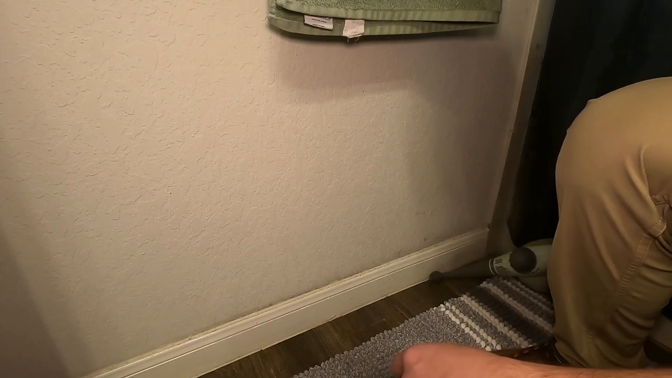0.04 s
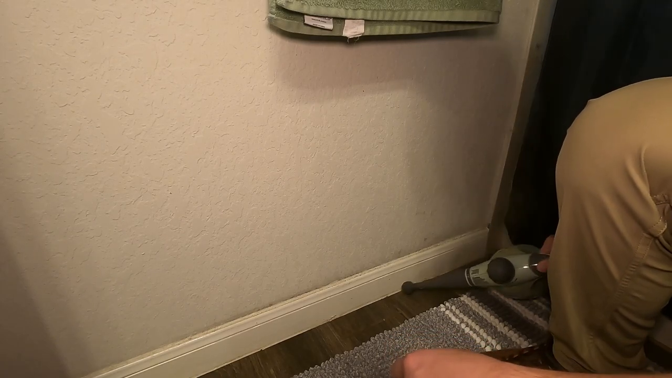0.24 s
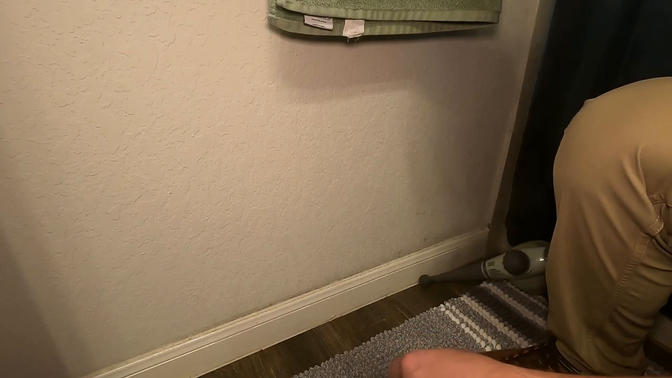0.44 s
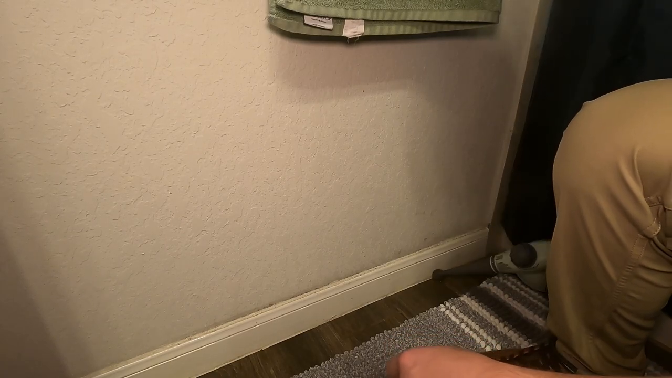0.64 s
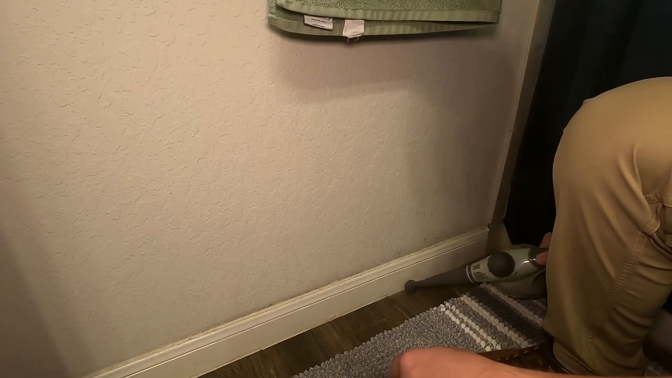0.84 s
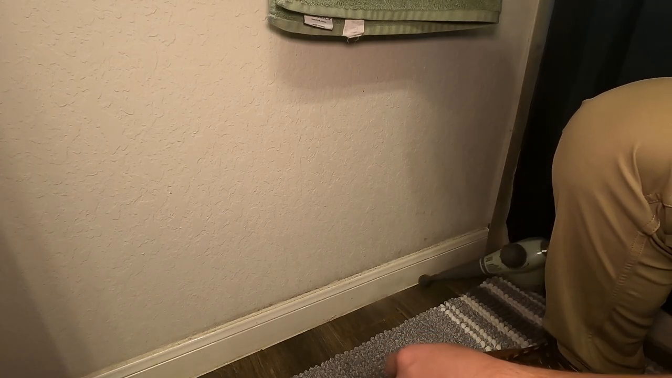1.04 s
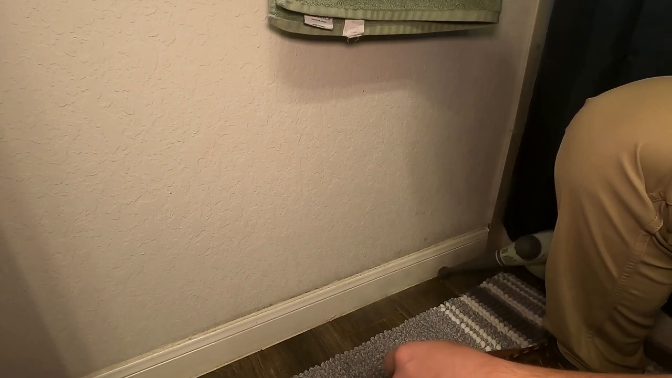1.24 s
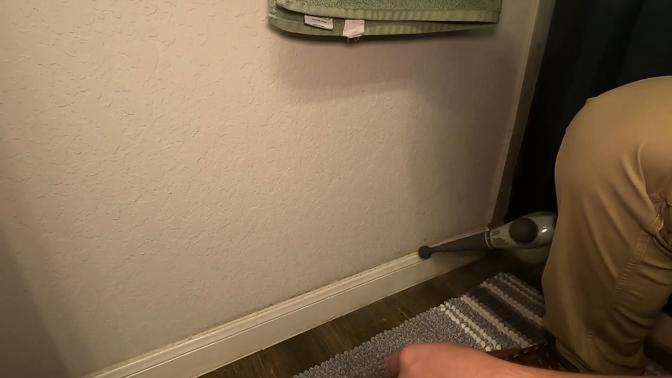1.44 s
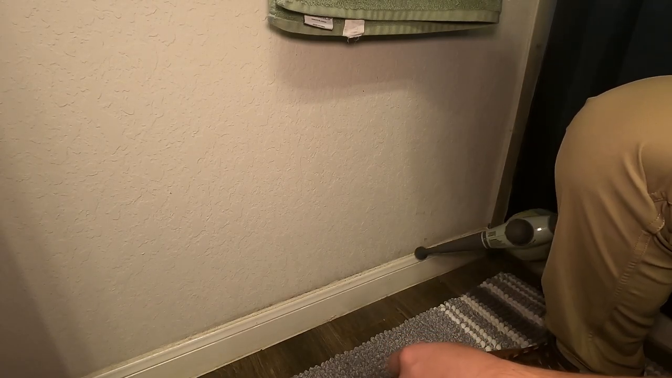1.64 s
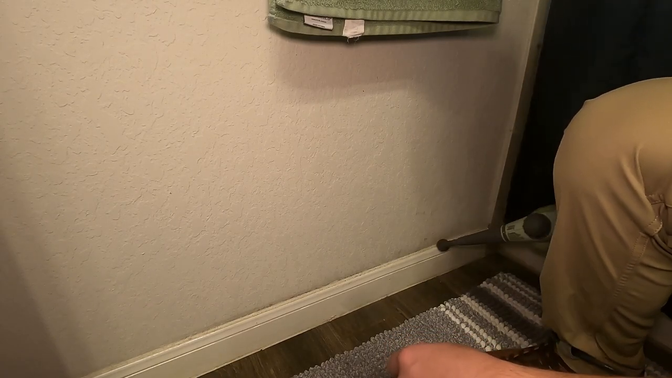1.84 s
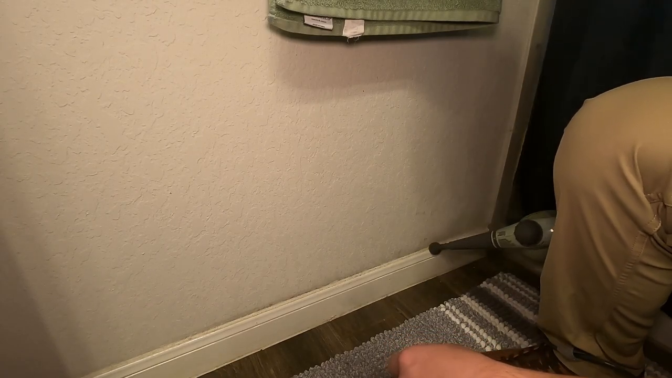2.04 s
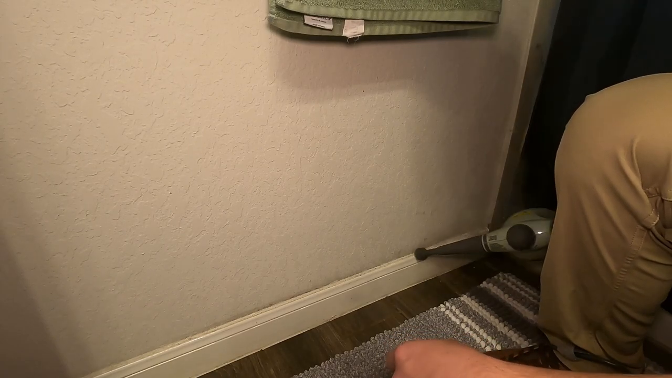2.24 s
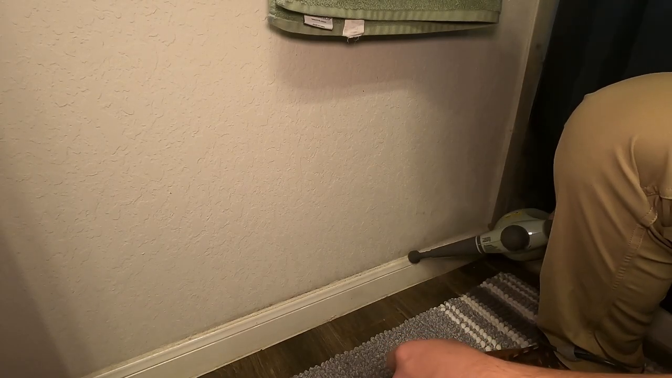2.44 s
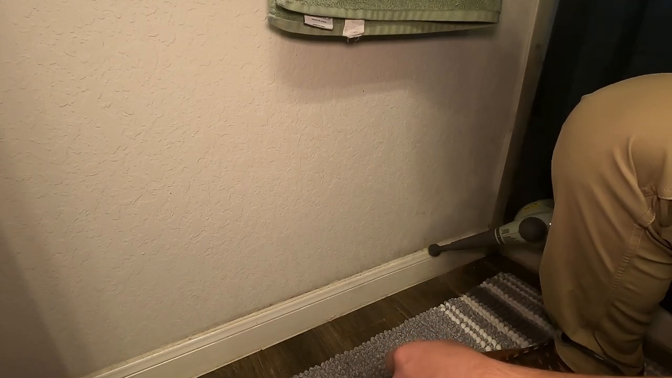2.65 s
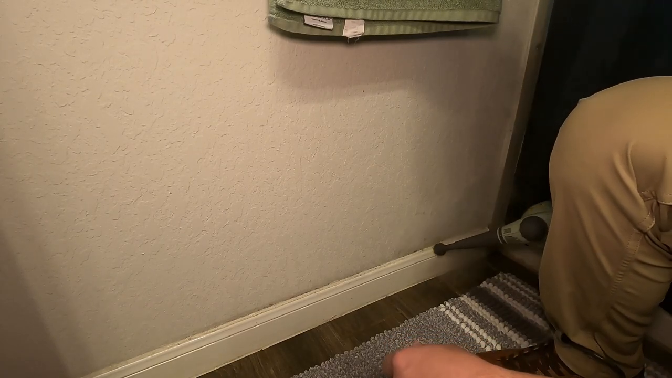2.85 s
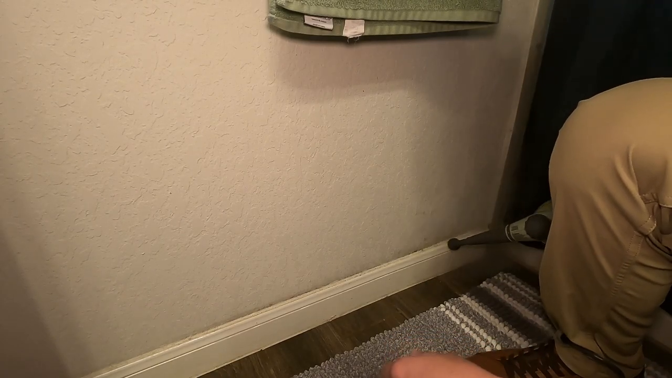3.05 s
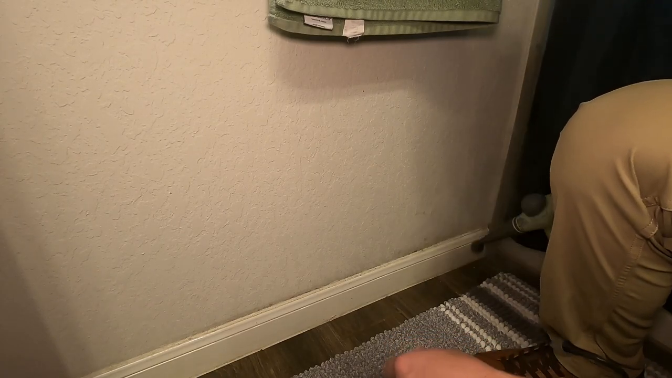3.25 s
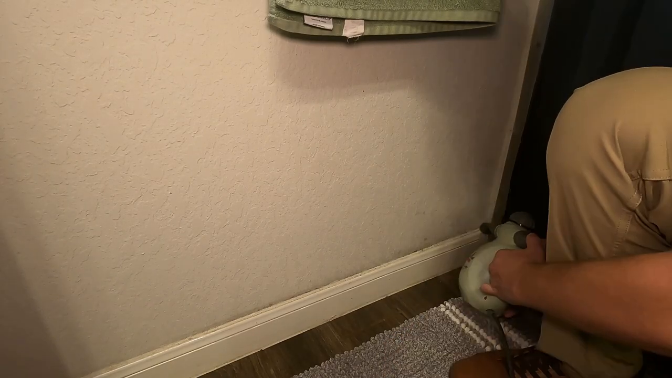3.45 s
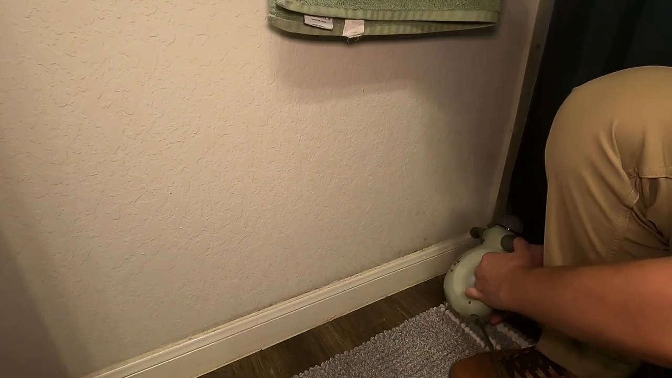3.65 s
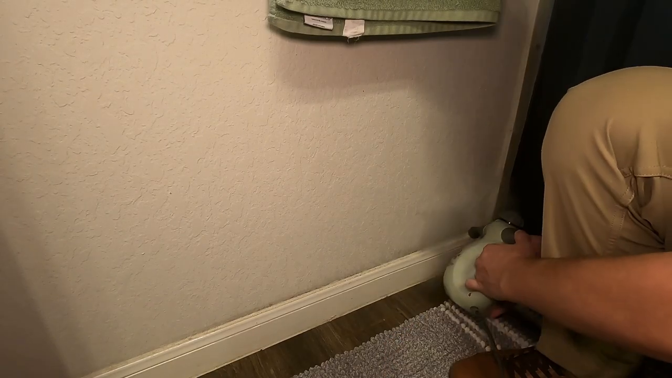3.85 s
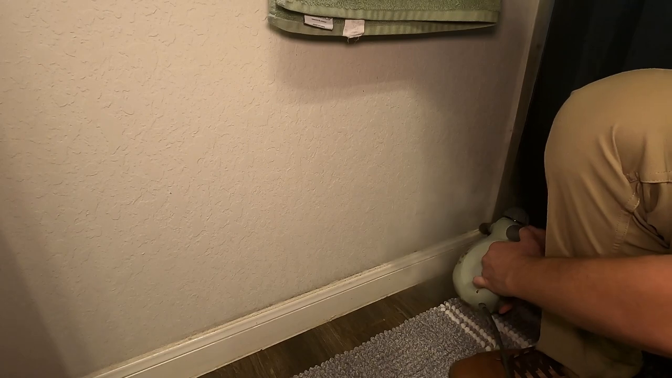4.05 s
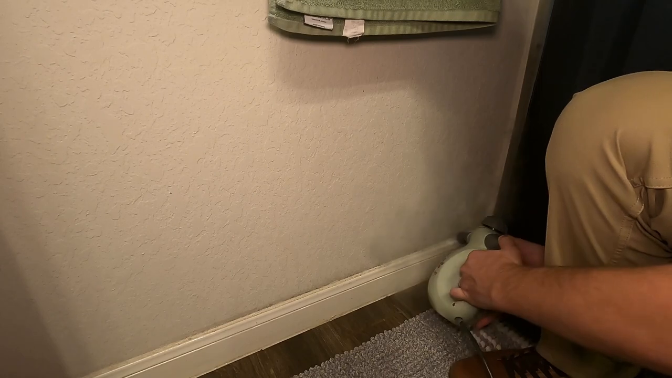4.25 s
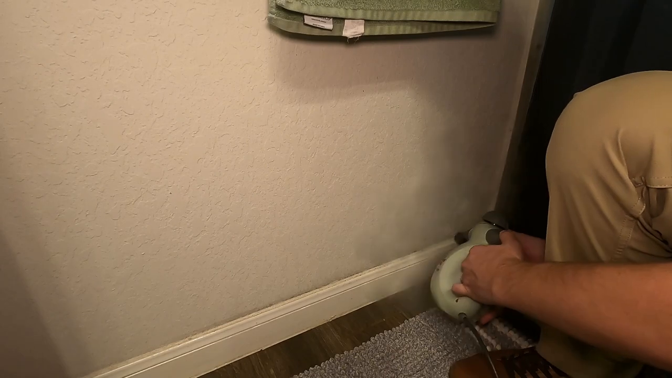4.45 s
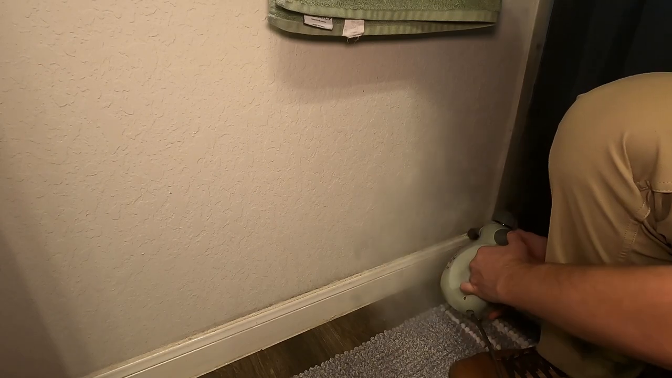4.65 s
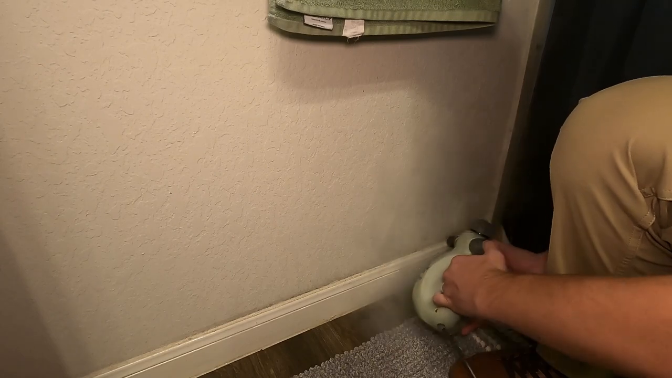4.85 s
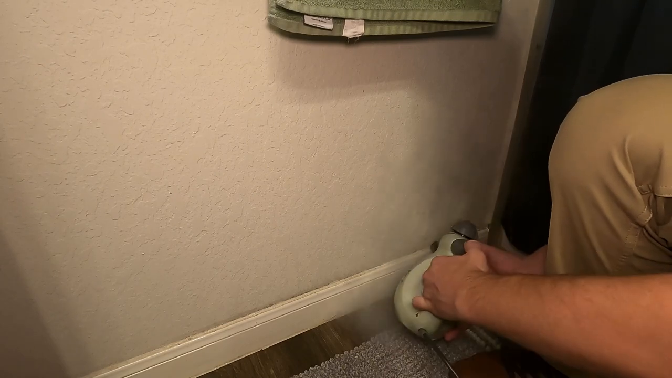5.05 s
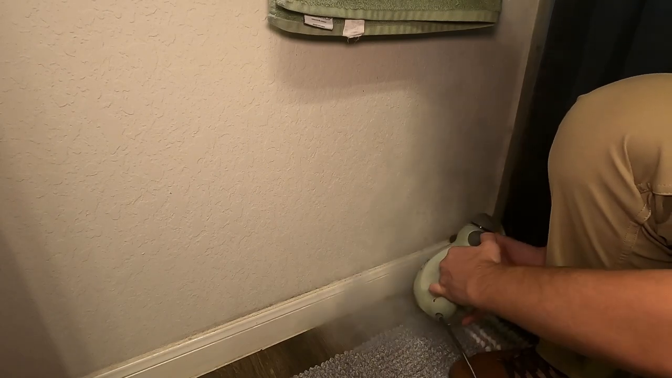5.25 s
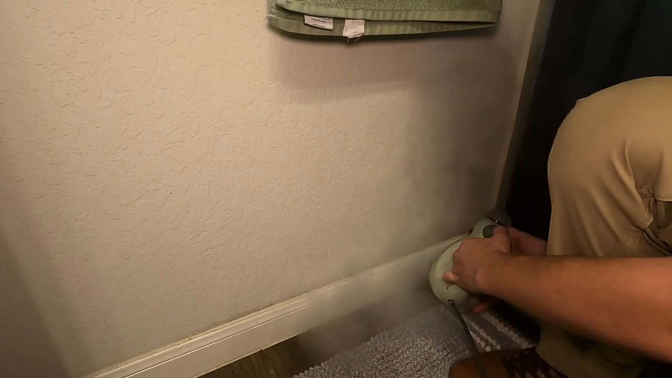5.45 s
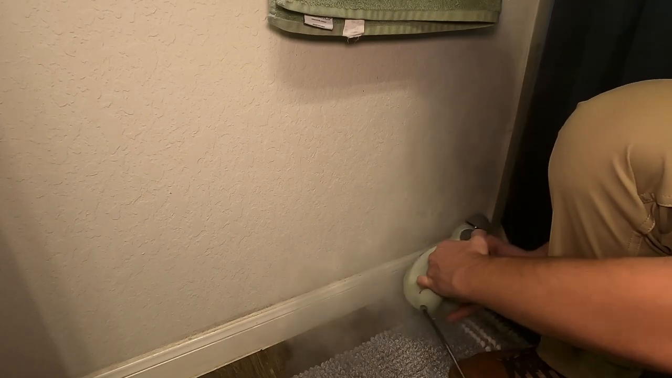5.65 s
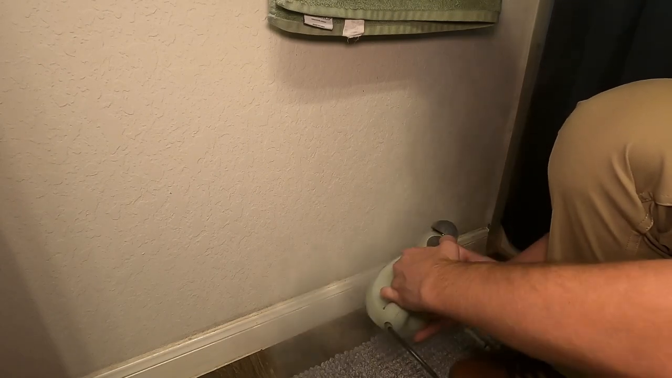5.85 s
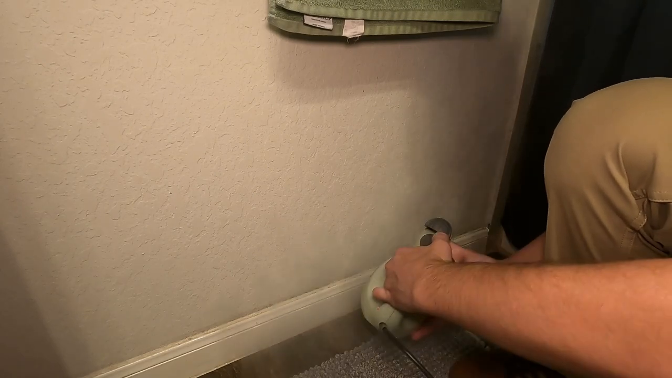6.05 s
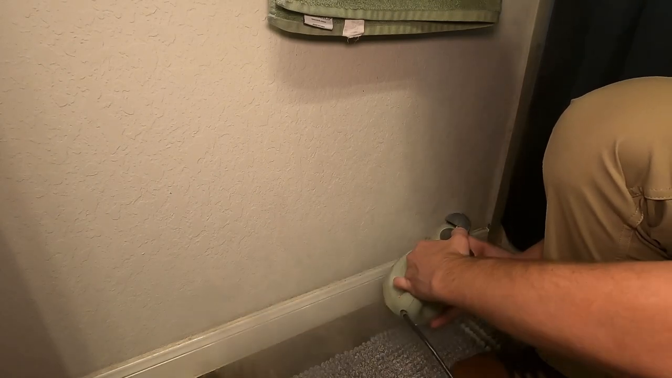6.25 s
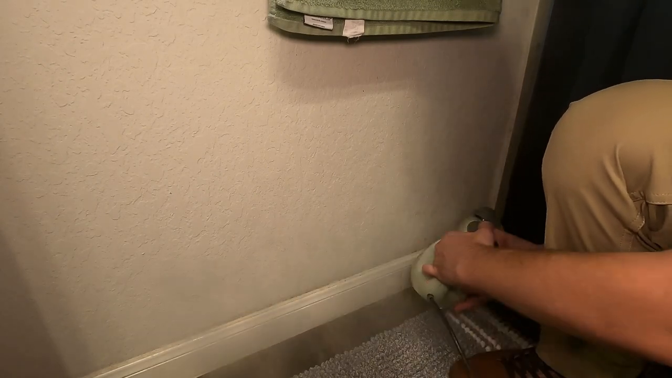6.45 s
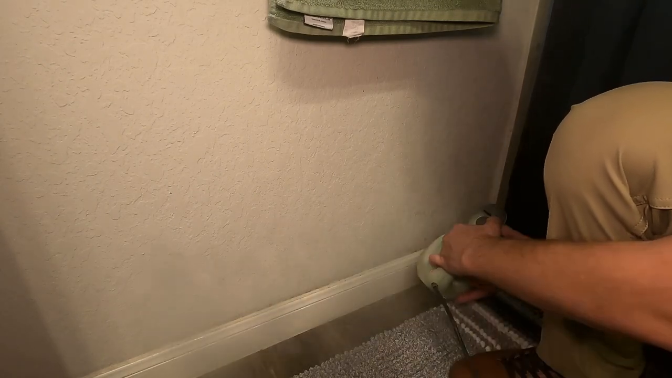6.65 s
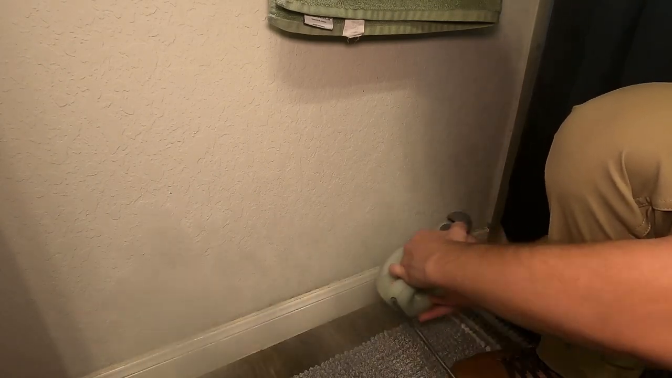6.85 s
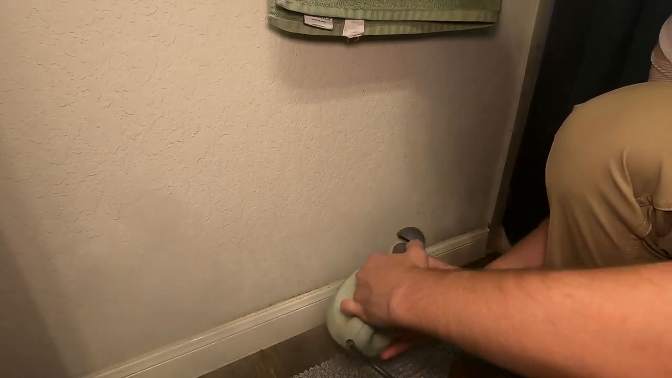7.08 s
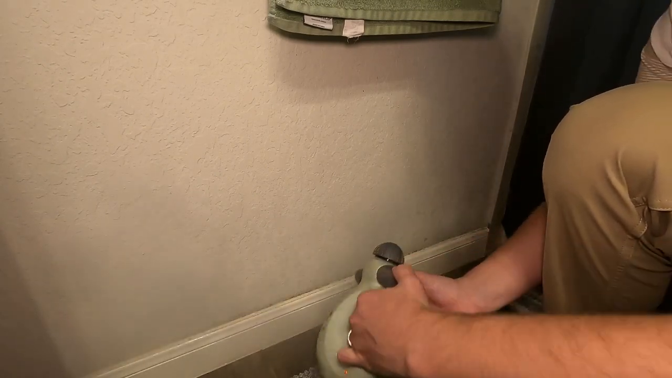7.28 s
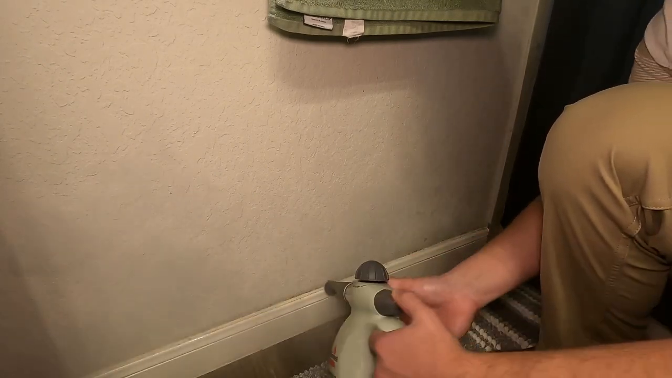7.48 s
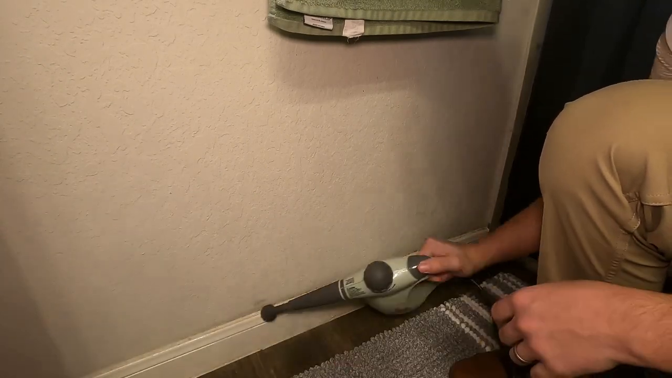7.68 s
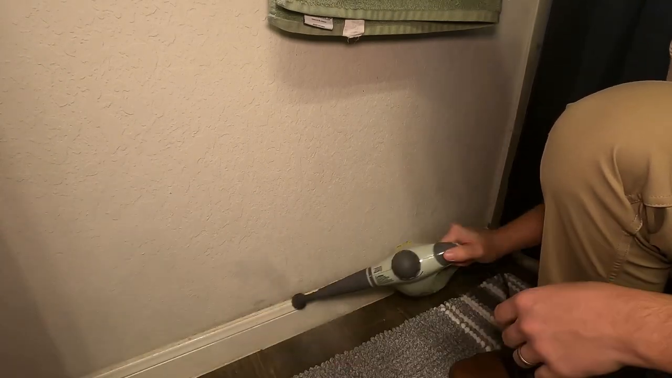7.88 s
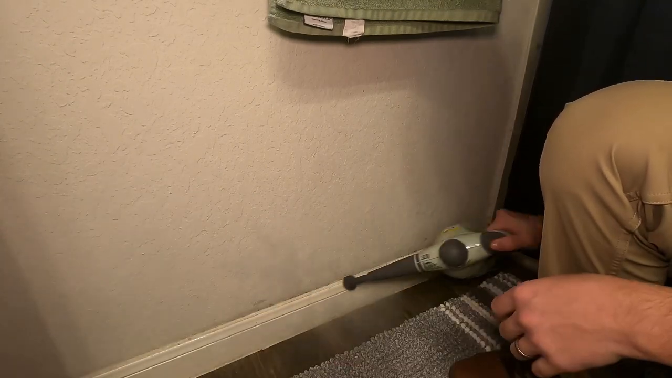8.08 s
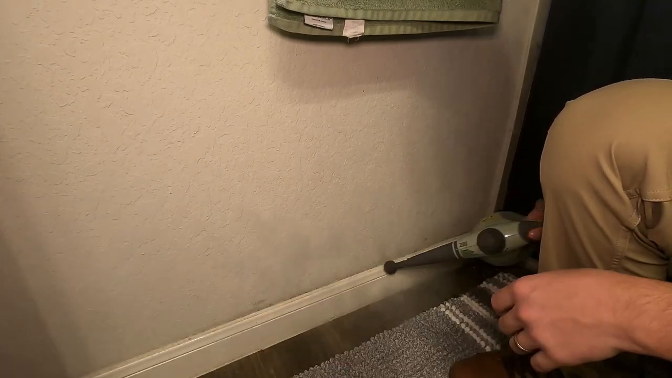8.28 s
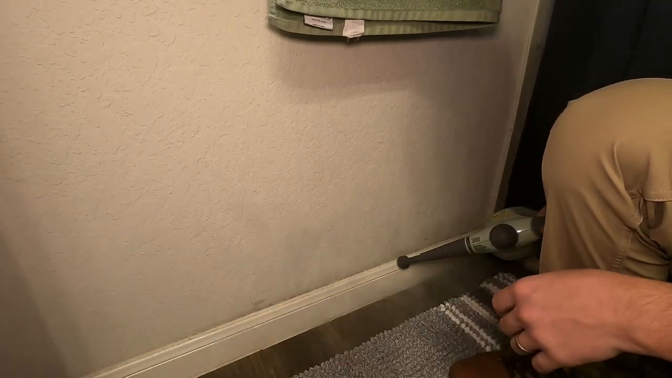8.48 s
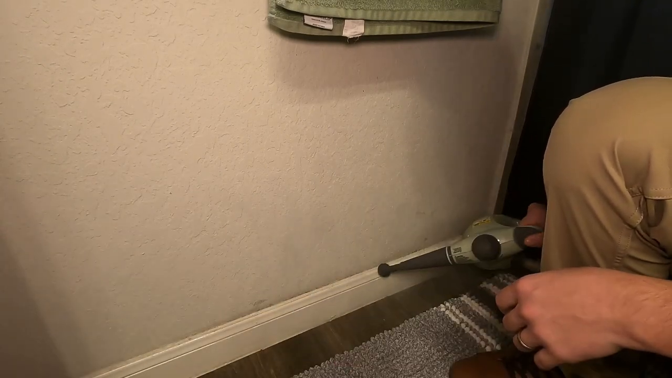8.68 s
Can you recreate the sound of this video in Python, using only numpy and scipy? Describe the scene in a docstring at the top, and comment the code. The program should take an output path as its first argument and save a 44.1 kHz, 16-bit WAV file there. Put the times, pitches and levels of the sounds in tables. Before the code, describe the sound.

Indoors, close to the floor, a handheld steam cleaner is already hissing, bright and flickering. From 0.15 to 1.5 s a bristly brush tip scrapes the skirting board in short, hollow, raspy strokes. At about 1.55 s the jet falls away, with a low thud at 1.66, then spits back at 1.85. More scrapes follow to 3.3 s, with small thumps and the heaviest floor thud at 3.1. The hiss dies at 3.4, leaving a brief gap with faint leaking steam and room noise, and bursts back abruptly at 3.6. It then runs long, its colour sweeping as the nozzle swings. A soft heavy bump comes at 5.3, dull scuffing drags from 5.8 to 6.75, and a tiny wet spit at 6.77. Stronger drags at 7.0 to 7.7 accompany low rumbling. The jet stops at 7.5, restarts near 7.75 with a thump and short scrape, and hisses to the end.

```python
"""Indoors, along a skirting board: a handheld steam cleaner, with one microphone close by on the floor.
The jet is noise in flickering bands; it is let off and pressed again three times, and it spits.
The floor sends it back up to about a millisecond late, so notches sweep as the nozzle swings.
The brush tip scrapes the board as noise through resonances; later, hands and machine drag along it.
Knees and the machine thud on the floor as sagging tones, and a low rumble comes and goes."""
import sys
import numpy as np
from scipy import signal
from scipy.fft import rfft, irfft
from scipy.io import wavfile
from scipy.ndimage import uniform_filter1d, map_coordinates

SR = 44100
rng = np.random.default_rng(int(sys.argv[2]) if len(sys.argv) > 2 else 0)


def waveform_to_disk(signal):
    """Save audio, clipped to [-1, 1], as 16-bit WAV at the path in sys.argv[1]."""
    frames = np.transpose(np.atleast_2d(signal))
    scaled = np.clip(frames, -1, 1) * 32767
    samples = np.round(scaled).astype(np.int16)
    wavfile.write(sys.argv[1], SR, samples)


N = 384552


def undb(db):
    """Amplitude factor of a level in dB."""
    return np.exp(np.asarray(db) * np.log(10) / 20)


def unit(x):
    """The signal scaled to an RMS of 1."""
    return x / np.sqrt(np.mean(x ** 2))


def curves(table):
    """Columns of a (time [s], ..) table, joined by straight lines."""
    s, *columns = np.transpose(table)
    return [np.interp(np.arange(N) / SR, s, column) for column in columns]


def coloured(outline):
    """Spectrum of noise with a (frequency [Hz], level [dB per Hz]) outline, and its frequencies."""
    hz = np.maximum(np.fft.rfftfreq(N, 1 / SR), 1)
    outline_hz, outline_db = np.transpose(outline)
    level_db = np.interp(np.log(hz), np.log(outline_hz), outline_db)
    return rfft(rng.standard_normal(N)) * undb(level_db), hz


def walk(rate):
    """Random levels, each held 1 / rate seconds, then smoothed twice; RMS of 1."""
    hold = int(SR / rate)
    steps = np.repeat(rng.standard_normal(N // hold + 1), hold)
    return unit(uniform_filter1d(uniform_filter1d(steps, hold), hold)[:N])


def ring(x, modes, sway_db=0):
    """Sum of two-pole resonances (frequency [Hz], width [Hz], level [dB]), each swaying alone."""
    total = 0
    for hz, width, db in modes:
        resonance = signal.lfilter(*signal.iirpeak(hz, hz / width, SR), x)
        total = total + undb(db + sway_db * walk(9)) * resonance
    return unit(total)


def band(x, lo_hz, hi_hz):
    """The part of the sound between two frequencies."""
    return signal.sosfilt(signal.butter(2, [lo_hz, hi_hz], "band", fs=SR, output="sos"), x)


def late(x, lag_ms):
    """The sound arriving after a moving lag, read between samples."""
    return map_coordinates(x, [np.arange(N) - lag_ms * SR / 1000], order=3)


# Pulls of the trigger, the first before the start:
# (pressed [s], rise [s], let go [s], fall [dB/s], valve seals [s])
TRIGGER_PULLS = [(-1, .03, 1.54, 88, 1.85), (1.835, .045, 3.37, 140, 3.48), (3.6, .011, 7.5, 135, 7.72),
                 (7.755, .04, 10, 100, 11)]
SURGE_DB, SURGE_S = 3., .07
SPLUTTER_DB, SPLUTTER_S = 12, .06
SEEP_DB, SEEP_S = -18, .03  # steam that slips past around the press
PUFF_DB, PUFF_S = -21, .012  # last puff as the valve seals
LEAK_DB, HUSH_S = -26, .02  # steady leak, and the hush before it creeps back


def trigger():
    """Valve gain and low splutter in dB: a seep, a quick rise with a surge, a fall until it seals."""
    t = np.arange(N) / SR
    gain, leak, splutter_db = 0, undb(LEAK_DB), 0
    for pressed, rise, let_go, fall_db, seals in TRIGGER_PULLS:
        since = np.maximum(t - pressed, 0)
        unsealed = t < seals
        seep = undb(SEEP_DB) * np.clip(1 - np.abs(t - pressed) / SEEP_S, 0, 1)
        opening = np.minimum(since / rise, 1) ** 2 + seep
        surge_db = SURGE_DB * since / SURGE_S * np.exp(1 - since / SURGE_S)
        closing_db = fall_db * np.maximum(t - let_go, 0)
        gain = gain + unsealed * opening * undb(surge_db - closing_db)
        gain = gain + unsealed * undb(PUFF_DB) * np.exp(-np.abs(seals - t) / PUFF_S)
        leak = leak * np.where(unsealed, 1, np.clip((t - seals) / HUSH_S, .3, 1))
        splutter_db = splutter_db + (t >= pressed) * SPLUTTER_DB * np.exp(-since / SPLUTTER_S)
    return 20 * np.log10(gain + leak), splutter_db


# Colour of the steam before its bands are levelled: (frequency [Hz], level [dB per Hz])
STEAM_COLOUR = [(200, -24.5), (1000, -25.5), (2100, -22), (2700, -13), (3050, -6), (3320, 0), (4310, -6),
                (5590, -3.5), (7000, -10.5), (8700, -10), (11000, -7), (13700, -9), (15600, -21)]
# Open jet, before valve and flicker: (time [s], level [dB])
JET_FLOW = [(0.05, -22.5), (0.13, -26), (0.38, -21.5), (0.66, -27.5), (0.9, -24.5), (1.2, -25.5),
            (1.5, -24.3), (1.9, -26.5), (1.96, -22.5), (2.18, -25.5), (2.5, -24), (2.6, -29.5), (2.73, -24),
            (3.04, -26), (3.36, -29), (3.65, -23.3), (3.83, -25), (4.89, -22.7), (5.01, -27), (5.1, -24),
            (5.83, -26.3), (6.1, -22), (6.36, -25.5), (6.66, -24.3), (6.78, -21), (6.89, -26.5),
            (7.25, -24.3), (7.5, -27.5), (7.8, -25.5), (8.2, -24.3), (8.7, -24)]
# Hiss under the main band, against the lower hiss, before splutter: (time [s], level [dB])
UNDER_HISS = [(.1, -19), (.35, -8), (1.25, -3), (1.5, -15), (1.7, -9), (1.9, -19), (2.4, -14), (2.8, -8),
              (3.4, -14), (3.7, -23), (6.1, -33), (7.3, -28), (7.8, -10), (8.3, -21)]
# Middle hiss against the lower hiss: (time [s], level [dB])
MIDDLE_HISS = [(.05, 10), (.15, -2), (.5, 3), (.63, -4), (.9, -5), (1.05, 2), (1.33, 0), (1.5, 9),
               (1.95, -7), (2.25, -7), (2.4, 5), (2.6, -6), (3.07, -8), (3.6, -2)]
# Treble against the lower hiss, the top before its trim: (time [s], upper level [dB], top level [dB])
TREBLE_HISS = [(0, -4, -22), (0.35, 5.5, -16), (0.62, -0.8, -27.5), (1.05, 6.5, -9.5), (1.25, 3.3, -23),
               (1.5, -2, -11.5), (1.85, -4, -20), (2.2, -1.5, -14), (2.45, -1, -23), (2.6, -6.5, -17.5),
               (2.85, -4, -27), (3.1, -2, -12), (3.4, -4.5, -19), (3.68, 5.5, -12.5), (3.95, -4.5, -23.5),
               (4.2, 2, -16.5), (4.5, -4.5, -15), (5.3, -1.5, -14), (5.7, 0.5, -19), (6.15, 1, -15),
               (6.8, -4.5, -18), (7.2, 2, -12.5), (7.7, -6, -23), (8.0, -1, -16)]
# Slugs of water through the nozzle, over the lower hiss: (time [s], level [dB])
WATER_SPITS = [(6.769, 13), (6.791, 7)]
SPIT_S = .003
# band edges
UNDER_HZ, MIDDLE_HZ, UPPER_HZ, TOP_HISS_HZ, AIR_HZ = (1950, 2800), 3650, 4950, 7690, 12240


def jet():
    """Turbulent steam in overlapping bands; droplets make it spit, each band flickers alone."""
    valve_db, splutter_db = trigger()
    flow_db, = curves(JET_FLOW)
    under_db = curves(UNDER_HISS)[0] + splutter_db
    middle_db, = curves(MIDDLE_HISS)
    upper_db, top_db = curves(TREBLE_HISS)
    t = np.arange(N) / SR
    spit_db = sum(db * np.exp(-((t - s) / SPIT_S) ** 2) for s, db in WATER_SPITS)

    spectrum, hz = coloured(STEAM_COLOUR)
    edges_hz = (*UNDER_HZ, MIDDLE_HZ, UPPER_HZ, TOP_HISS_HZ, AIR_HZ)
    # share of the spectrum above each edge
    under, lower, middle, upper, top, air = (1 / (1 + (edge / hz) ** 14) for edge in edges_hz)
    # (share of the spectrum, level [dB], slow flicker [dB])
    bands = ((1 - under, -24.5, 1.2),
             (under - lower, under_db, 1.3),
             (lower - middle, spit_db, 1.1),
             (middle - upper, middle_db, 1.1),
             (upper - top, upper_db, 1.1),
             (top - air, top_db - 1.2, 3.8),
             (air, top_db - 4., 3.8))
    steam = 0
    for share, db, sway_db in bands:
        flicker_db = sway_db * walk(7) + 1.25 * walk(250)
        steam = steam + unit(irfft(spectrum * share, N)) * undb(db + flicker_db)
    # upper, middle and lower hiss share the total level; overlapping neighbours add in step
    upper_gain, middle_gain = undb(upper_db), undb(middle_db)
    overlap = .7 * middle_gain * (1 + upper_gain)
    steam = steam / np.sqrt(1 + upper_gain ** 2 + middle_gain ** 2 + overlap)
    return steam * undb(flow_db + valve_db + 0.64 * walk(400))


# Turning points of the nozzle's swing: (time [s], extra path by way of the floor [ms])
NOZZLE_SWINGS = [(1.2, .67), (1.55, .9), (1.85, .62), (2.25, .6), (2.5, .43), (2.75, .97), (3.05, .97),
                 (3.2, .42), (3.72, .18), (3.91, .35), (4.02, .35), (4.15, .18), (4.25, .18), (4.54, .47),
                 (4.76, .33), (4.87, .33), (5.21, .65), (5.6, .33), (5.74, .33), (6.1, 1.12), (6.26, 1.12),
                 (6.8, .31), (7.15, .8), (7.6, .57), (7.78, .25)]


def swing():
    """The hand eases from one turning point to the next, changing the delay off the floor."""
    s, lag_ms = np.transpose(NOZZLE_SWINGS)
    points = np.arange(len(s))
    place = np.interp(np.arange(N) / SR, s, points)
    whole = np.floor(place)
    eased = (1 - np.cos(np.pi * (place - whole))) / 2
    return np.interp(whole + eased, points, lag_ms)


# Strength of the floor bounce, before path loss and sway: (time [s], share [0-1])
FLOOR_SHARE = [(3.5, 0.35), (3.6, 0.7), (7.05, 0.55), (7.3, 0.2)]
BOUNCE_HZ = (3440, 7500)
BOUNCE_FADE_DB_PER_MS, BOUNCE_SWAY_DB = 6., 1.8
TILES_SHARE, TILES_MS, TILES_SWAY_MS = 0.23, 9., 0.2557  # each tile's share, spread of lags, sway


def bounced(steam):
    """Direct jet with its floor bounce, then further tiles whose paths sway as the hand moves."""
    floor_ms = swing()
    share, = curves(FLOOR_SHARE)
    # longer paths come back weaker
    share = share * undb(BOUNCE_SWAY_DB * walk(5) - BOUNCE_FADE_DB_PER_MS * floor_ms)
    # only the middle of the hiss comes back whole: the rest misses or scatters
    outside = signal.butter(2, BOUNCE_HZ, "bandstop", fs=SR, output="sos")
    mirrored = steam - signal.sosfiltfilt(outside, steam)
    corner = (steam + share * late(mirrored, floor_ms)) / np.sqrt(1 + share ** 2)
    far = 0
    for place in (np.arange(6) + rng.random(size=6)) / 6:
        far = far + late(corner, 1.5 + TILES_MS * place + TILES_SWAY_MS * walk(2.5))
    return (corner + TILES_SHARE * far) / np.sqrt(1 + 6 * TILES_SHARE ** 2)


# Colour of the room's noise, before it is levelled: (frequency [Hz], level [dB per Hz])
ROOM_COLOUR = [(40, -26), (120, -11), (600, 0), (3400, -24.5), (9000, -42)]
ROOM_DB = -51.5


def room_tone():
    """Steady noise of the room, strongest in the lower mids and falling towards the treble."""
    return unit(irfft(coloured(ROOM_COLOUR)[0], N)) * undb(ROOM_DB)


# Joists, boards and panels of the floor: (frequency [Hz], width [Hz], level [dB])
FLOOR_MODES = [(53.3, 68, 0), (117.6, 44, 3), (230, 180, -5)]
# Their steady drive, before the level of each mode, one row each: (level [dB])
STEADY_RUMBLE = [
    [-65],
    [-58],
    [-75],
]


def floor_rumble(shake):
    """Noise through the floor's resonances, faint and steady, stronger where blows shake it."""
    rumble = []
    for mode in FLOOR_MODES:
        resonance = ring(ring(rng.standard_normal(N), [mode]), [mode])
        rumble.append(resonance * undb(mode[2] + 2.3 * walk(14)))
    return np.sum((shake + undb(STEADY_RUMBLE)) * rumble, axis=0)


# Brush strokes along the board, before the mix: (start [s], end [s], level [dB], bristle rasp [dB])
BRUSH_STROKES = [(0.147, 0.306, -38, -43), (0.28, 0.487, -43, -46), (0.656, 0.75, -43, -41),
                 (0.754, 1.103, -36, -41), (1.117, 1.365, -37, -42), (1.354, 1.523, -36, -44),
                 (1.65, 1.8, -47, -50), (1.843, 1.909, -41, -44), (2.06, 2.207, -40, -45),
                 (2.327, 2.508, -39.5, -39.5), (2.537, 2.677, -43, -50), (2.66, 2.985, -38, -38),
                 (3.039, 3.335, -42, -43), (3.485, 3.687, -41.5, -60), (4.141, 4.192, -43, -52),
                 (7.755, 7.855, -46, -56)]
# Hands and machine dragged on wall and floor, before the mix:
# (start [s], end [s], level [dB], rasp [dB])
FLOOR_DRAGS = [(5.28, 5.42, -43, -64), (5.799, 6.107, -45, -52), (6.246, 6.753, -45.5, -53),
               (6.993, 7.174, -44, -54), (7.17, 7.44, -39, -61), (7.467, 7.7, -38, -61)]
# Resonances of the hollow wall, the board and the bristles: (frequency [Hz], width [Hz], level [dB])
WALL_BOOM = [(182, 20, 4), (226, 27, -4)]
BOARD_MODES = [(312, 30, 2), (350, 30, 4), (397.6, 32, 6), (506, 51, 4.5), (574, 41, 4), (674, 48, -4.5),
               (836, 31, 1.5)]
BRISTLE_RASP = [(1181, 31, 0.5), (1438, 380, -0.5), (1815, 230, -0.5)]
# The wall booms less near the corner: (time [s], level [dB])
CORNER_FADE = [(1.6, 0), (2., -5)]
BRUSH_MIX_DB, DRAG_MIX_DB = (-4.5, .1), (5.1, -8)  # added to (boom of the hollow wall, scrape on board)
BRUSH_EDGE_S, DRAG_EDGE_S = .02, .06
MODE_SWAY_DB = 3.  # each resonance swells alone as the brush travels


def stroke_gains(table, mix_db, edge_s):
    """Gains of boom, scrape and rasp while each stroke lasts, with softened edges."""
    boom_db, scrape_db = mix_db
    gains = np.zeros((3, N))
    for start, end, db, rasp_db in table:
        first, last = int(start * SR), int(end * SR)
        fade_db = np.linspace(0, -2.5, last - first)  # the hand slows down
        levels_db = [db + boom_db, db + scrape_db, rasp_db]
        gains[:, first:last] = undb(np.add.outer(levels_db, fade_db))
    return uniform_filter1d(gains, int(edge_s * SR))


def strokes():
    """Bristles and drags slip unevenly, ringing hollow wall, board and bristles for each stroke."""
    brush = stroke_gains(BRUSH_STROKES, BRUSH_MIX_DB, BRUSH_EDGE_S)
    drags = stroke_gains(FLOOR_DRAGS, DRAG_MIX_DB, DRAG_EDGE_S)
    total = brush + drags
    # the room lets each stroke trail off
    gains = np.maximum(total, signal.lfilter([.0004], [1, .0004 - 1], total))
    gains[0] *= undb(curves(CORNER_FADE)[0])
    rings = []
    for modes, lo_hz, hi_hz in (WALL_BOOM, 140, 300), (BOARD_MODES, 280, 1050), (BRISTLE_RASP, 1050, 2200):
        slips = rng.standard_normal(N) * undb(2.1 * walk(25))
        rings.append(unit(band(ring(slips, modes, MODE_SWAY_DB), lo_hz, hi_hz)))
    return np.sum(gains * rings, axis=0)


# Thuds on the floor, level before rise and decay, pitch once settled:
# (time [s], level [dB], pitch [Hz], rise [s], time for the rumble's drive to fall 60 dB [s])
FLOOR_THUDS = [(1.659, -23, 140, .003, 0.4), (2.171, -27.5, 69.5, .003, 0.4), (2.449, -27, 121, .003, 0.33),
               (2.83, -30, 60, .01, .6), (3.116, -13, 92.5, .003, 0.75), (3.202, -24, 105, .003, 0.34),
               (3.585, -30, 100, .01, .3), (4.145, -35, 192, .003, 0.21), (4.6, -33, 104, .02, 0.9),
               (5.28, -20, 106, .05, 0.6), (5.97, -32, 120, .03, .6), (6.232, -32, 100, .02, 2.5),
               (7.05, -32, 115, .05, 3.), (7.778, -28.5, 111, .003, .8)]
THUD_T60_S, AFTER_DB = 0.076, -12  # decay of the blow, drive of the rumble against it


def thuds():
    """Each blow is a short sagging ring with an overtone; also returns how it shakes the floor."""
    blows, shake = np.zeros(N + SR), np.zeros((len(FLOOR_MODES), N + SR))
    t = np.arange(SR) / SR
    for s, db, hz, rise_s, t60 in FLOOR_THUDS:
        at = slice(int(s * SR), int(s * SR) + SR)
        phase = 2 * np.pi * hz * (t + 0.0025 * (1 - np.exp(-t / 0.0065)))
        rise = np.minimum(t / rise_s, 1)
        tone = np.sin(phase) + 0.32 * np.sin(2.8 * phase)
        blows[at] += rise * tone * undb(db - 60 * t / THUD_T60_S)
        # low blows stir the joists, higher ones the boards, all the panels
        deep = np.clip((150 - hz) / 90, .1, 1)
        shake[:, at] += np.outer([deep, 1 - deep, .5], rise * undb(db + AFTER_DB - 60 * t / t60))
    return blows[:N], shake[:, :N]


RIGHT_DB = -6  # right side against the left


def scene():
    """Everything reaches one microphone, fed weaker to the right."""
    blows, shake = thuds()
    mono = bounced(jet()) + room_tone() + floor_rumble(shake) + strokes() + blows
    sides = np.array([[1], [undb(RIGHT_DB)]])
    # the mean of both sides keeps the level
    return mono * sides / sides.mean()


TOP_HZ = 15740


def record(dry):
    """A steep low-pass cuts the top of what the microphone picks up."""
    return signal.sosfilt(signal.ellip(14, .2, 60, TOP_HZ, fs=SR, output="sos"), dry)


dry = scene()
out = record(dry)
waveform_to_disk(out)
```